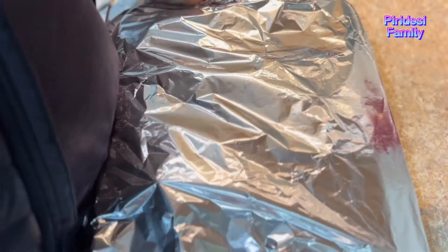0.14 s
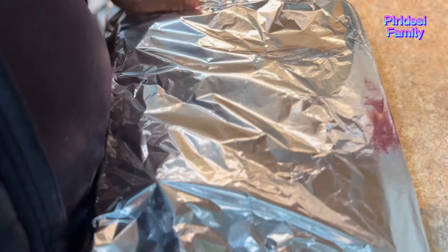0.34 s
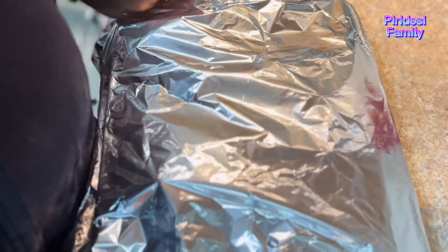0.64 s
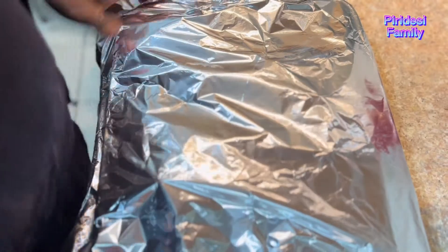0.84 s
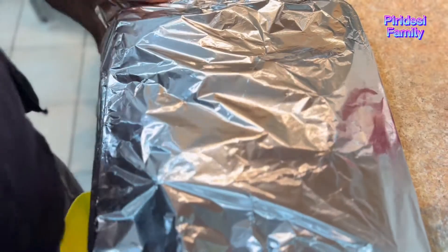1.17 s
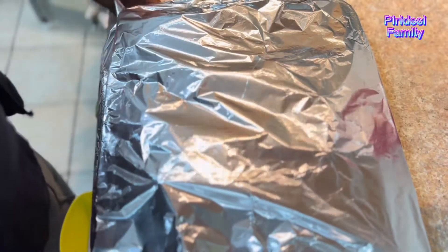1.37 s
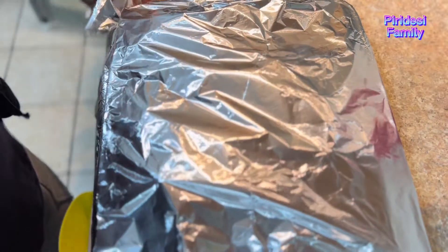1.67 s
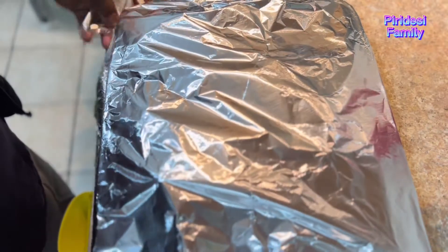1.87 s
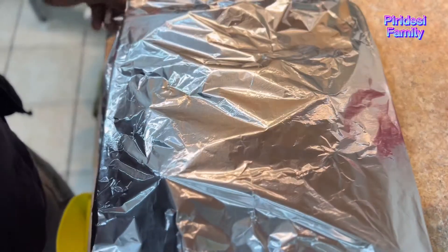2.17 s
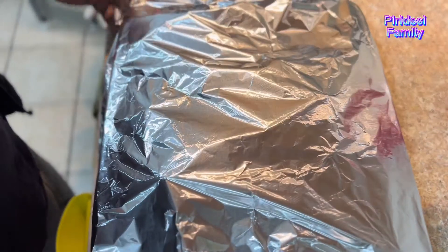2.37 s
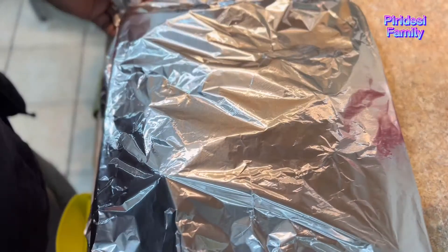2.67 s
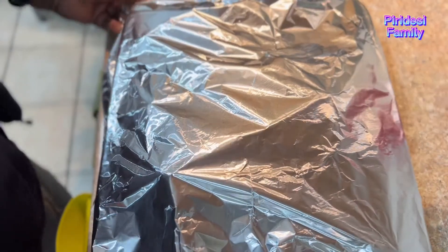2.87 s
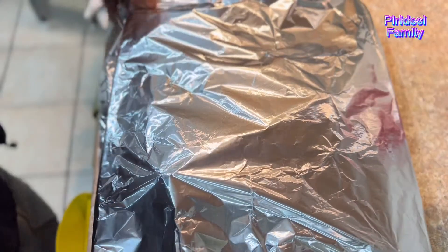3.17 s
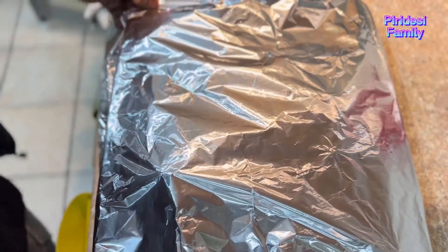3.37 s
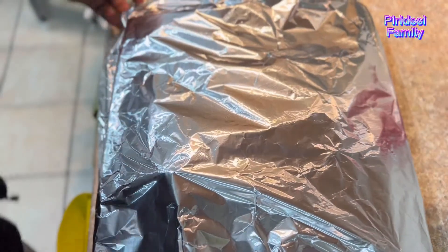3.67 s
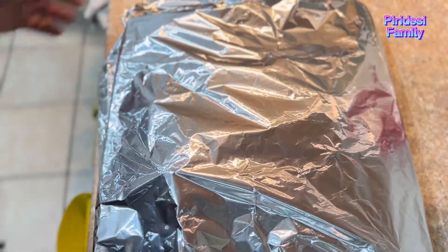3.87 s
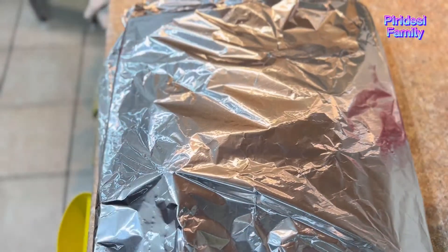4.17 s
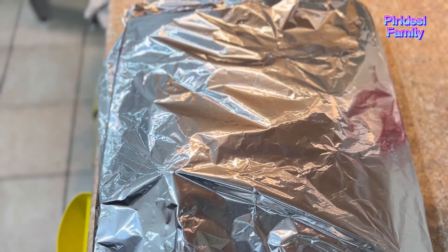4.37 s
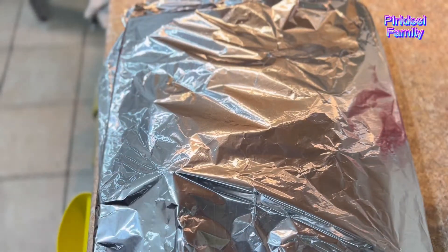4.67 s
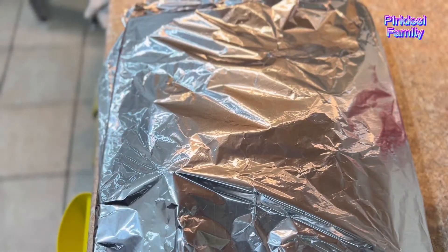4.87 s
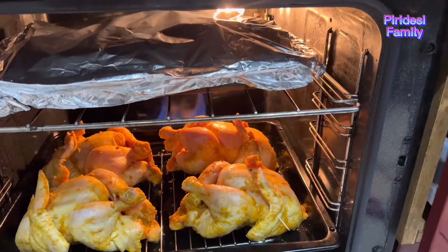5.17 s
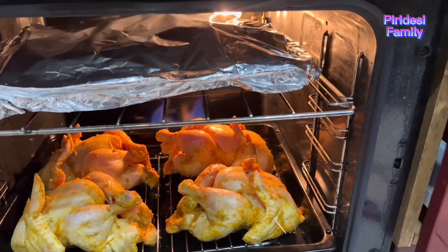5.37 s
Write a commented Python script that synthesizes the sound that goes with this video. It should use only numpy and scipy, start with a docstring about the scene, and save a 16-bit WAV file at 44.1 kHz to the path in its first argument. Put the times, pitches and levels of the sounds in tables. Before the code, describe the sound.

In a hard-walled kitchen, a close stereo phone microphone picks up aluminium foil being pressed and crimped over a baking tray. From 0 to about 3.6 s, bright, dense crinkling comes in irregular squeezes several times a second, strongest near 0.3 s and gradually easing. Sharp snaps scatter left and right, loose patches pop hollowly, mostly in the first half second, and soft thuds, tray booms and dull knocks sit underneath. A faint fridge hum runs throughout this part. From 3.6 to 4.97 s the hands let go: only tiny rustles, small pops and light knocks remain, one at about 4.9 s, with a faint treble hiss that dips and returns. After a momentary silence, an open oven's low rumble and hiss begins at 4.98 s, with rushes of air shifting sides. At 5.28 s metal clanks loudly on the left, rebounds quickly, chatters and rings with a short echo until the end near 5.6 s.

```python
"""In a hard-walled kitchen, hands press and crimp aluminium foil over a baking tray, close to a phone.
Tiny creases ring bits of the sheet; big ones snap, loose patches pop and the tray thuds and booms.
A fridge hums, small knocks are heard, and a faint treble hiss comes once the hands have left.
After a cut the phone faces an open oven: filtered noise makes its rumble, hiss and rushes of air.
A piece of metal clanks on the left, as a set of dying notes over a noisy crack."""
import sys
import numpy as np
from scipy import signal
from scipy.fft import rfft, irfft, next_fast_len
from scipy.io import wavfile
from scipy.ndimage import uniform_filter1d

SR = 44100
rng = np.random.default_rng(int(sys.argv[2]) if len(sys.argv) > 2 else 0)


def inscribe(sig):
    """Save sig as 16-bit PCM at rate SR to the path in sys.argv[1].

    A 1-D sig is mono; a 2-D sig holds one channel per row.
    Samples are clipped to [-1, 1] before scaling.
    """
    pcm = np.round(np.clip(np.atleast_2d(sig).T, -1, 1) * 32767)
    wavfile.write(sys.argv[1], SR, pcm.astype(np.int16))


N = 244314


def amp(db):
    """Turns decibels into a gain."""
    return 10 ** (np.asarray(db) / 20)


def evened(x):
    """Scales a sound to an average (rms) level of 1."""
    return x / np.sqrt(np.mean(x ** 2) + 1e-20)


def read(points, hz):
    """Reads a (pitch, value) table, with pitch spaced by ratio as the ear hears it."""
    f, value = np.transpose(points)
    return np.interp(np.log(hz + 1), np.log(f + 1), value)


def columns(rows, t):
    """Reads every column after the first at the places t in the first column."""
    s, *rest = np.transpose(rows)
    return [np.interp(t, s, c) for c in rest]


def add(mix, s, sound):
    """Mixes a two-channel sound in at s seconds."""
    part = mix[:, round(s * SR):][:, :sound.shape[1]]
    part += sound[:, :part.shape[1]]


def coloured(x, gain_db):
    """Filters a whole sound; gain_db gives the gain in dB at each pitch in Hz."""
    size = next_fast_len(x.shape[-1] + 4096)
    gain = amp(gain_db(np.fft.rfftfreq(size, 1 / SR)))
    return irfft(rfft(x, size) * gain, size)[..., :x.shape[-1]]


def noise(length=N):
    """Two separate channels of plain noise."""
    return rng.standard_normal((2, length))


def wander(per_s):
    """A slow random drift of rms 1: noise whose changes faster than per_s are weakened."""
    drift = coloured(rng.standard_normal(N), lambda hz: -20 * np.log10(1 + (hz / per_s) ** 2))
    return evened(drift)


def sides(pan_db):
    """Left and right gains; a positive pan_db makes the left louder."""
    return amp([[pan_db / 2], [-pan_db / 2]])


# Each squeeze of the fingers: start_s, rise_s, hold_s, crinkle_db,
# rattle_db (slack sheet, below about 2 kHz), treble_db (extra, above about 9 kHz)
SQUEEZES = [(-0.036, 0.01, 0.034, -32.5, -2, 2), (0.046, 0.022, 0.052, -38.5, -3.5, -2),
            (0.109, 0.066, 0.091, -34, 0.5, 0), (0.248, 0.025, 0.01, -33.5, -2.5, 4),
            (0.277, 0.013, 0.046, -27.5, -5.5, -3), (0.33, 0.033, 0.067, -30.5, -6, -1),
            (0.434, 0.009, 0.013, -32.5, -3.5, 2.5), (0.543, 0.019, 0.002, -38.5, -8, 1),
            (0.599, 0.13, 0.0088, -32.5, -3.5, -1), (0.832, 0.0095, 0.075, -33.5, -3, 1),
            (0.936, 0.004, 0.096, -39, -9, 1.5), (0.976, 0.039, 0.092, -30.5, -5, 1),
            (1.119, 0.012, 0.111, -32.5, -5.5, .3), (1.265, 0.044, 0.076, -32.5, -5.5, -1),
            (1.373, 0.029, 0.061, -32.5, -7, -0.8), (1.494, 0.026, 0.086, -34, -7, 0),
            (1.698, 0.024, 0.002, -43.5, -15, -0.5), (1.766, 0.0073, 0.15, -37.5, -8, 0),
            (1.818, 0.027, 0.12, -32, -6, -1), (1.95, 0.011, 0.046, -35, -4.5, -0.5),
            (2.018, 0.036, 0.015, -28.5, -10.5, 0.5), (2.233, 0.012, 0.062, -42, -7.5, 3),
            (2.32, 0.012, 0.0048, -32.5, -11.5, 0.7), (2.37, 0.006, 0.034, -44.5, -4, .3),
            (2.43, 0.067, 0.176, -35.5, -7, -1.5), (2.601, 0.03, 0.11, -38, -6.5, 0),
            (2.757, 0.007, 0.014, -32, -9, .3), (2.828, 0.048, 0.002, -36.5, -4, -1.5),
            (2.927, 0.035, 0.065, -35, -6, .3), (3.098, 0.017, 0.054, -34.5, -6.5, -0.7),
            (3.198, 0.027, 0.072, -37, -7.5, 1.7), (3.337, 0.042, 0.012, -44.5, 0, .3),
            (3.411, 0.012, 0.087, -35, -6, -0.5), (3.576, 0.026, 0.1, -52.5, -3.5, 8),
            (3.812, 0.12, 0.052, -55.5, 6, -4), (4.125, 0.054, 0.026, -52, -3.5, -1)]
# Faint rustle under and after the squeezes: time_s, level_db, rattle_db
SETTLING = [(0.0, -54, 4), (3.5, -51, -5), (3.76, -63.5, 2), (4.04, -65.5, 9), (4.29, -70, -3.5),
            (4.47, -65, -3), (4.65, -83, 7), (4.84, -64, -4.5), (4.97, -64.5, -5)]
# Harder squeezes fold finer creases: crinkle_db, treble_db (above about 9 kHz)
THIN_CREASES = [(-70, -16), (-54.5, -17), (-44, -6), (-34.5, -0.5), (-25, 3)]
RISE_DB, SAG_DB_PER_S, RELEASE_DB_PER_S = 9, 22.5, 144  # climb from start to top, sag while held, fall after


def fingers(t):
    """Crinkle, rattle and treble in dB: each squeeze rises, sags while held and lets go; powers add."""
    start, rise, hold, top_db, rattle_db, treble_db = np.transpose(SQUEEZES)[:, :, None]
    after = t - start - rise  # seconds since the top of the squeeze
    rising = -RISE_DB * after / rise
    falling = SAG_DB_PER_S * np.minimum(after, hold) + RELEASE_DB_PER_S * np.maximum(after - hold, 0)
    each = amp(top_db - np.where(after < 0, rising, falling)) ** 2

    rest_db, rest_rattle_db = columns(SETTLING, t)
    rest = amp(rest_db) ** 2
    power = each.sum(0) + rest
    level_db = 10 * np.log10(power)
    # the loudest squeeze has the most say in the colour
    rattle = ((each * rattle_db).sum(0) + rest * rest_rattle_db) / power
    treble = columns(THIN_CREASES, level_db)[0] + (each * treble_db).sum(0) / power
    return level_db, rattle, treble


# Basic colour of the foil: pitch_hz, level_db (per Hz)
FOIL = [(150, -27.5), (300, -3), (600, 9.5), (800, 7), (1250, 11.5), (1800, 8.5), (2500, 6.5), (4000, 6),
        (6200, 7.5)]
# The top of that colour: pitch_hz, level_db (relative to the last FOIL level)
FOIL_TOP = [(7200, -2), (8500, -1), (10500, -4), (11600, -1), (13300, -5), (14700, -4), (16500, -5)]


def foil_db(hz, rattle_db, thin_db):
    """Colour of the foil: slack sheet changes the low end, fine creases the top."""
    low = 1 / (1 + (hz / 2300) ** 4)
    high = 1 / (1 + (9500 / (hz + 1)) ** 8)
    top = [(f, FOIL[-1][1] + db) for f, db in FOIL_TOP]
    return read(FOIL + top, hz) + low * rattle_db + high * thin_db


CREASES_PER_S, CREASE_SPREAD_DB, CREASE_T60_S = 3500, 3.0, 0.079  # T60: time to die by 60 dB
FACETS = 24


def crinkle():
    """Thousands of tiny creases, a few of them large, each shaking its own facet of the sheet."""
    clumps = amp(1.5 * wander(40))  # creases set each other off
    happens = rng.random(N) < clumps * CREASES_PER_S / SR
    size = amp(CREASE_SPREAD_DB * np.minimum(rng.exponential(1, N), 5)) * happens
    facet = rng.integers(0, FACETS, N)
    t = np.arange(2048) / SR
    fading = amp(-60 * t / 0.0038) + amp(-0.5 - 60 * t / CREASE_T60_S)  # a tick, then a longer ring
    sheet = np.zeros((2, N))
    for k, facet_hz in enumerate(np.linspace(700, 15500, num=FACETS)):
        # small facets ring high
        shake = coloured(noise(2048) * fading, lambda hz: 11.96 / (1 + ((hz - facet_hz) / 450) ** 2))
        sheet += signal.oaconvolve((size * (facet == k))[None], shake, axes=1)[:, :N]

    # shape level and colour over time, following the fingers
    hz, s, z = signal.stft(evened(sheet), SR, nperseg=256, noverlap=192)
    level_db, rattle_db, thin_db = fingers(s)
    patches = uniform_filter1d(rng.standard_normal(z.shape[1:]), size=5, axis=0)
    patches = evened(uniform_filter1d(patches, size=30, axis=1))  # slow unevenness in the colour
    z = z * amp(level_db + foil_db(hz[:, None], rattle_db, thin_db) + 1.36 * patches)
    return signal.istft(z, SR, nperseg=256, noverlap=192)[1][:, :N] * sides(1.0)


# Weight coming down on the tray: middle_s, half_length_s, thud_db (counter), boom_db (tray)
PRESSES = [(0.185, 0.069, -54, -52), (0.304, 0.076, -42.5, -44.5), (0.438, 0.061, -50, -51),
           (0.558, 0.051, -63, -60), (0.754, 0.038, -63, -53), (0.89, 0.08, -48.5, -48),
           (1.068, 0.064, -59, -50.5), (1.33, 0.1, -69, -64), (1.56, 0.11, -64, -59),
           (1.88, 0.055, -61, -48), (2.08, 0.075, -61, -65), (2.355, 0.1, -65, -65), (2.645, .05, -63, -51),
           (2.815, 0.036, -60, -71), (2.95, 0.078, -70, -55.5), (3.127, 0.067, -65, -58.5),
           (3.314, .05, -57, -53), (3.464, 0.09, -61, -50.5), (3.826, 0.085, -66, -55),
           (3.967, 0.049, -67.5, -59), (4.162, 0.054, -67, -57.5), (4.22, 0.046, -53.5, -70),
           (4.94, 0.039, -61, -64)]
# Booming notes of the tray: pitch_hz, half_width_hz, level_db
TRAY = [(156.7, 28, 0.5), (295, 170, -8)]
PRESS_EDGE_DB = -14  # fall from the middle of a press to its ends
THUD_REST_DB, BOOM_UNDER_CRINKLE_DB = -69, -23.5  # between presses the boom follows the fingers


def tray():
    """Pressing thuds through the counter and sets the tray booming: low noise swells with each press."""
    t = np.arange(0, N / SR, .002)
    middle, half, thud_db, boom_db = np.transpose(PRESSES)[:, :, None]
    bump_db = PRESS_EDGE_DB * ((t - middle) / half) ** 2
    thud_gain = amp(thud_db + bump_db).sum(0) + amp(THUD_REST_DB)
    boom_gain = amp(boom_db + bump_db).sum(0) + amp(fingers(t)[0] + BOOM_UNDER_CRINKLE_DB)

    thud = coloured(noise(), lambda hz: -20 * np.log10(1 + ((hz - 78) / 38) ** 4))
    boom = np.zeros((2, N))
    for f, width, db in TRAY:
        boom += amp(db) * coloured(noise(), lambda hz: -15 * np.log10(1 + ((hz - f) / width) ** 2))
    now = np.arange(N) / SR
    return np.interp(now, t, thud_gain) * evened(thud) + np.interp(now, t, boom_gain) * evened(boom)


# Colour of the quiet room, read only from 135 Hz up: pitch_hz, level_db (per Hz)
KITCHEN = [(18, -57), (30, -27), (64, -30), (80, -4), (101, 5), (132, -28), (311, -33.5), (395, -20.5),
           (424, -30), (1300, -55), (1820, -31), (2420, -43), (9000, -78), (11700, -74.5), (19800, -120)]
KITCHEN_DB = -66  # average level of the room noise
# Steady notes of the fridge: pitch_hz, level_db (rms)
HUM = [(100, -57), (196.5, -76), (245.5, -78.5), (295, -82.5), (392.8, -73), (441.5, -90), (491.2, -77),
       (539, -87.5), (589.5, -81)]


def kitchen():
    """Quiet room noise, and the fridge's hum as pure tones that waver slightly in level."""
    t = np.arange(N) / SR
    # flat below 135 Hz, and 40 dB weaker below 120 Hz
    air = coloured(noise(), lambda hz: read(KITCHEN, np.maximum(hz, 135)) - 40 * (hz < 120))
    hum = np.zeros(N)
    for hz, db in HUM:
        level = np.sqrt(2) * amp(db + 0.94 * wander(13))
        hum += level * np.sin(2 * np.pi * (hz * t + rng.random()))
    return amp(KITCHEN_DB + 1.3 * wander(6)) * evened(air) + hum


# Creases that buckle at once: start_s, peak_db, thin_treble_db, pan_db (left minus right)
SNAPS = [(0.0665, -20, 12, -3), (0.2877, -17, 2, 13), (0.3418, -15, -3, 4), (0.437, -17, 10, -6),
         (0.5615, -20, 1, -2), (0.719, -24, -1, 11), (0.842, -31, 13, -0.5), (0.9, -15.5, 2, 0),
         (0.9454, -18.5, 15, -13), (1.0097, -18, 7, -1), (1.0279, -15, 7, 1), (1.1286, -16.5, 6.5, 2.5),
         (1.2947, -20, 7, 3), (1.335, -15, 5, 1), (1.4541, -19, 8, 4), (1.5234, -18, 8, -6),
         (1.5592, -20.5, -13, 1.5), (1.677, -38, 6, 0.3), (1.7208, -32, -9, 0), (1.7749, -20.5, 1, 5),
         (1.833, -29, 3, 6.5), (1.9177, -17, 10.5, -1), (1.9754, -15.5, 6, -6), (2.054, -16, 3, -8),
         (2.19, -28, 4, 7), (2.2403, -28, 8, -4), (2.3262, -22, 9, -2.5), (2.5117, -17, 6, 6),
         (2.5593, -24, 12, 2), (2.631, -23, -3, 9), (2.7623, -28, 5, 2), (2.784, -20.5, 1, 0.3),
         (2.887, -23, 9, 6), (2.955, -17, 7, 2), (3.0109, -32, -1, 5), (3.0674, -31, -2, 0),
         (3.1056, -20, 9, 3), (3.2361, -20, 7, -1), (3.274, -15.5, 5, 0), (3.337, -30, 3, -3),
         (3.3676, -23, 6, 2.5), (3.414, -19.5, 7, -4), (3.454, -19, -17, 0), (3.606, -36, 11, -3),
         (3.6895, -30.5, 15, -6), (3.7908, -47, -12, 8), (3.8382, -45, -9, 3), (3.9719, -42, -10, 3),
         (4.0577, -45.5, -20, 4), (4.0936, -44, -11, 0.3), (4.154, -45, -5, 1)]
SNAP_T60_S, SNAP_RATTLE_DB = 0.075, -10.5


def snaps():
    """Each buckle is a sudden burst of foil-coloured noise that dies away."""
    out, t = np.zeros((2, N)), np.arange(6000) / SR
    for s, db, thin_db, pan_db in SNAPS:
        burst = coloured(noise(6000), lambda hz: foil_db(hz, SNAP_RATTLE_DB, thin_db))
        burst *= amp(-60 * t / SNAP_T60_S) * np.minimum(t / 0.00037, 1)
        add(out, s, amp(db) * sides(pan_db) * burst / abs(burst).max())
    return out


# Slack sheet popping in and out: start_s, peak_db, pan_db (left minus right), pitch_hz, t60_s
POPS = [(0.161, -17.5, -1, 1140, 0.04), (0.174, -23.5, -3, 1250, 0.045), (0.288, -15.5, -4, 1180, 0.034),
        (0.32, -22, -3, 1470, 0.036), (0.338, -21.5, -4, 1250, 0.031), (0.374, -29, 5, 1270, 0.033),
        (0.53, -29.5, 4, 1100, 0.05), (1.035, -30, 0, 1200, 0.041), (1.37, -38, 0, 1190, 0.05),
        (2.454, -32, 5, 1520, 0.055), (2.641, -31, 9, 1320, 0.048), (2.764, -30, 3, 1600, 0.092),
        (2.956, -29, -1, 1110, 0.086), (3.84, -46, 4, 1520, 0.04), (3.884, -44, 7, 1550, 0.04),
        (3.896, -42, 7, 1300, 0.036), (3.929, -41, 5, 1050, 0.059), (3.983, -37.5, -3, 2170, 0.061),
        (4.004, -47, -4, 877, 0.04), (4.018, -47, 1, 1540, 0.041)]


def pops():
    """A loose patch of foil flips over with a short, rough note: noise gathered round one pitch."""
    out, t = np.zeros((2, N)), np.arange(6000) / SR
    for s, db, pan_db, pitch_hz, t60 in POPS:
        note = coloured(noise(6000), lambda hz: -20 * np.log10(1 + ((hz - pitch_hz) / 170) ** 2))
        note *= amp(-60 * t / t60) * np.minimum(t / 0.00016, 1)
        add(out, s, amp(db) * sides(pan_db) * note / abs(note).max())
    return out


def struck(modes, crack_db, crack_hz, crack_t60):
    """A blow: dying notes, in different phase on each side, over a noisy crack; peak 1."""
    t = np.arange(SR // 2) / SR
    rings = np.zeros((2, len(t)))
    for hz, db, t60 in modes:
        rings += amp(db - 60 * t / t60) * np.sin(2 * np.pi * (hz * t + rng.random((2, 1))))

    def crack_colour(hz):
        low_cut = 1 + (crack_hz / (2.4 * hz + 1)) ** 4
        high_cut = 1 + (hz / (1.72 * crack_hz)) ** 8
        return -10 * np.log10(low_cut * high_cut)

    crack = evened(coloured(noise(len(t)), crack_colour)) * amp(crack_db - 60 * t / crack_t60)
    blow = (rings + crack) * np.minimum(t / 0.0006, 1)
    return blow / abs(blow).max(axis=1, keepdims=True)


# How long the echo lasts: pitch_hz, t60_s
WALLS = [(250, 0.23), (1000, 0.36), (3000, 0.14), (8000, 0.068), (14000, 0.041)]


def walls(x):
    """What the hard walls return: a tail of noise, each band dying at its own speed."""
    t = np.arange(SR // 2) / SR
    late = noise(len(t)) * (t > .004)
    hz, s, z = signal.stft(late, SR, nperseg=256)
    tail = signal.istft(z * amp(-60 * s / read(WALLS, hz)[:, None]), SR, nperseg=256)[1]
    return signal.fftconvolve(x.mean(0)[None], tail / np.linalg.norm(tail[0]), axes=1)[:, :N]


# Dull knocks: start_s, peak_db, pan_db (left minus right), pitch_factor
KNOCKS = [(0.287, -25, 4, 1.18), (0.719, -32, 1.0, 1.16), (1.039, -34, -5, 1.3), (1.859, -29.5, -8, 1.34),
          (2.63, -37, 10, 1.7), (3.467, -32.5, -5, 1.21), (3.7954, -36.5, -1, 0.92), (3.828, -44, 1, 1.2),
          (3.9735, -34.5, 3, 0.96), (4.133, -39, 2, 1.07), (4.149, -42.5, -8.5, 1.33),
          (4.919, -34.5, 1.5, 1.07), (5.527, -46, 7, 1.357)]
# Notes in a knock, before the pitch factor: pitch_hz, level_db, t60_s
KNOCKED = [(416, 2, 0.02), (576, -0.5, 0.034), (810, -7, 0.0069), (1120, -8, 0.014), (1600, -8, 0.0089)]


def knocks():
    """Small knocks, a few quickly dying notes and a crack each, with their echo."""
    out = np.zeros((2, N))
    for s, db, pan_db, pitch in KNOCKS:
        modes = [(hz * pitch, level_db, t60) for hz, level_db, t60 in KNOCKED]
        add(out, s, amp(db) * sides(pan_db) * struck(modes, -3.0, 1200, .01))
    return out + walls(amp(-15.0) * out)


# A faint hiss that drops out for a moment: time_s, level_db
HISS_LEVEL = [(4.2, -90), (4.28, -72), (4.5, -72.5), (4.58, -82.5), (4.72, -88), (4.76, -65.5), (4.97, -63)]
# Colour of that hiss: pitch_hz, level_db (per Hz)
HISS = [(1500, -20), (3000, -5), (6500, 3.5), (9500, -3), (16000, -6.5)]


def hiss():
    """Smooth treble noise once the hands have left."""
    smooth = coloured(noise(), lambda hz: read(HISS, hz))
    return amp(columns(HISS_LEVEL, np.arange(N) / SR)) * evened(smooth)


# Colour of the oven's roar: pitch_hz, level_db (per Hz)
OVEN = [(30, -2), (100, 4.5), (300, -5.5), (520, -8), (800, -20), (1250, -9.5), (1600, -9), (3500, -19),
        (5700, -16), (6500, -15), (7700, -22.5), (9000, -26.5), (10500, -26), (12000, -19), (12700, -17.5),
        (13400, -28), (15200, -20), (16500, -28)]
# Oven loudness: time_s, roar_db, left_rush_db, right_rush_db (the rush is near 1.8 kHz)
OVEN_LEVEL = [(4.98, -55, -79, -75), (5.05, -53.5, -79, -64), (5.16, -55, -65, -73),
              (5.25, -56.5, -56, -74), (5.3, -46.5, -78, -62), (5.42, -55.5, -67, -58),
              (5.54, -55.5, -54, -67)]


def oven():
    """Rumble and hiss from the open oven, and rushes of air that swell on one side or the other."""
    roar_db, *rush_db = columns(OVEN_LEVEL, np.arange(N) / SR)
    roar = coloured(noise(), lambda hz: read(OVEN, hz))
    rush = coloured(noise(), lambda hz: -15 * np.log10(1 + ((hz - 1800) / 600) ** 2))
    return evened(roar) * amp(roar_db + 0.87 * wander(30)) * sides(2.8) + evened(rush) * amp(rush_db)


# The metal's blow and rebounds: start_s, peak_db, pan_db (left minus right)
CLANKS = [(5.2815, -15.5, 9.5), (5.2848, -15, 5), (5.291, -18.5, 4), (5.343, -35, 10)]
# Notes of the metal: pitch_hz, level_db, t60_s
CLANKED = [(562, -5.5, 0.06), (1022, -23, 0.27), (1354, -1.5, 0.05), (1393, -11.5, 0.27), (1642, -10, 0.14),
           (1620, -9, 0.18), (1730, -12, 0.23), (1949, -13.5, 0.48), (2095, -2.5, 0.11),
           (2270, -4.5, 0.083), (2456, -3, 0.097), (2773, 2, 0.06), (3160, -14, 0.07), (3930, -10, .04),
           (4250, -7, 0.036), (4970, -11, .05), (5420, -12, 0.055)]
CHATTER_DB = -29.5


def clank():
    """Metal rings at each rebound, loose parts chatter on as dying noise, and the walls answer."""
    out = np.zeros((2, N))
    for s, db, pan_db in CLANKS:
        add(out, s, amp(db) * sides(pan_db) * struck(CLANKED, 2.9, 2960, 0.023))
    add(out, CLANKS[0][0], amp(CHATTER_DB) * sides(3.0) * struck([], 0, 3300, 0.29))
    return out + walls(amp(-8.5) * out)


# Short silence between the two scenes: start_s, end_s
CUT_S = (4.974, 4.982)


def scene():
    """The counter, the cut, the oven; knocks are heard on both sides of the cut."""
    t = np.arange(N) / SR
    first = np.clip((CUT_S[0] - t) / 0.004, 0, 1)
    second = np.clip((t - CUT_S[1]) / 0.0013, 0, 1)
    counter = crinkle() + tray() + kitchen() + snaps() + pops() + hiss()
    return first * counter + second * oven() + (first + second) * (knocks() + clank())


# How alike left and right are in the bass: pitch_hz, likeness (0 to 1)
BASS_SHARED = [(30, .98), (100, .97), (170, .94), (300, .66), (600, .3), (1500, .15), (2500, 0)]
# The same in the treble, where the left is upside down: pitch_hz, likeness (0 to 1)
TREBLE_SHARED = [(2500, 0.15), (4000, 0), (7000, 0), (8600, 0.42), (9300, 1), (9900, 1), (16000, 1)]
PORT_LAG_S = 2.88e-4  # the left treble comes this much later
EDGE_HZ = 15900  # nearly nothing passes well above this pitch


def record(dry):
    """The phone's two ports agree in the bass; the left treble is a late, inverted copy of the right."""
    size = next_fast_len(N + 1024)
    hz = np.fft.rfftfreq(size, 1 / SR)
    left, right = rfft(dry, size)
    bass = np.clip(read(BASS_SHARED, hz), 0, 1)
    treble = np.clip(read(TREBLE_SHARED, hz), 0, 1)
    late = np.exp(-2j * np.pi * hz * PORT_LAG_S)
    shared = bass * amp(-0.5) - treble * late  # the right port is fuller in the bass
    own = np.sqrt(np.clip(1 - bass ** 2 - treble ** 2, 0, 1))
    left = own * left + shared * right
    low_cut = 1 / (1 + (42 / (hz + 1)) ** 6)
    pair = irfft(np.array([left, right]) * low_cut, size)[:, :N]
    high_cut = signal.firwin(511, EDGE_HZ, window=("kaiser", 9), fs=SR)
    return signal.oaconvolve(pair, high_cut[None], "same")


dry = scene()
out = record(dry)
inscribe(out)
```